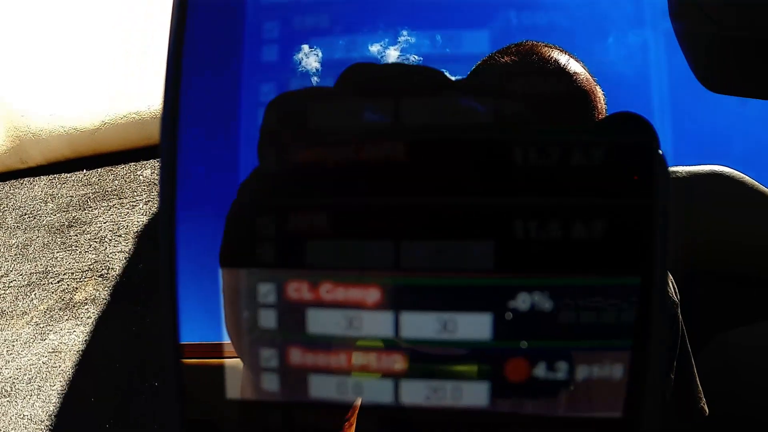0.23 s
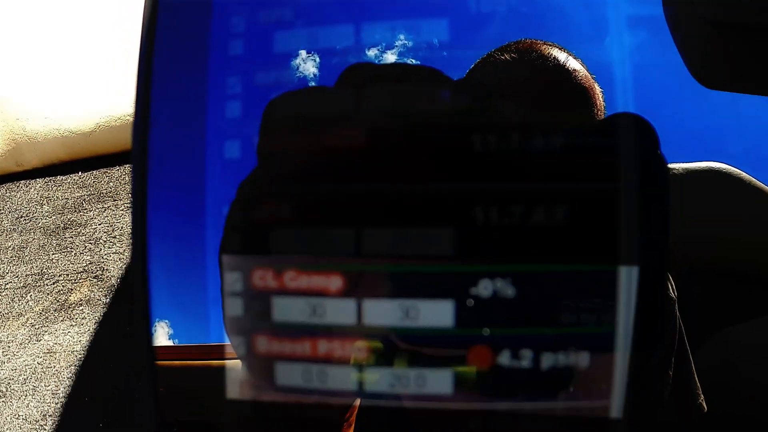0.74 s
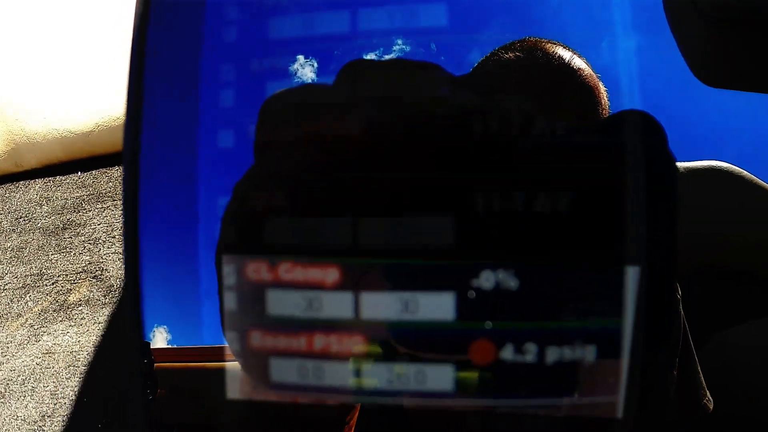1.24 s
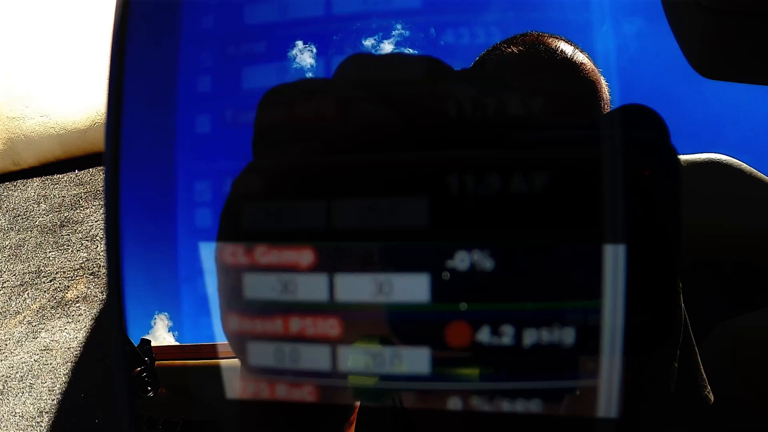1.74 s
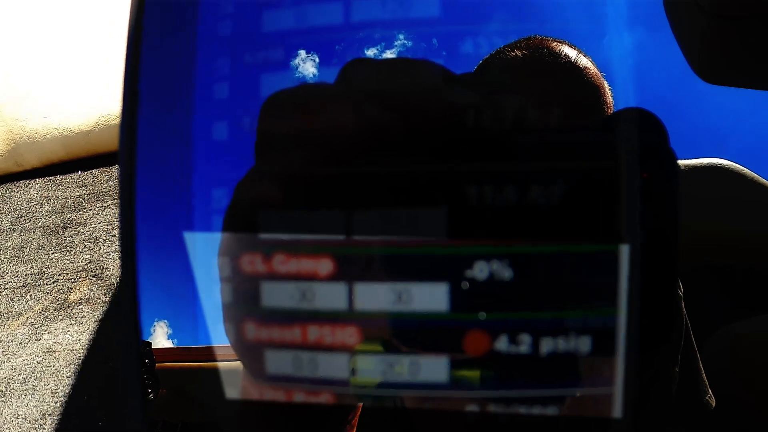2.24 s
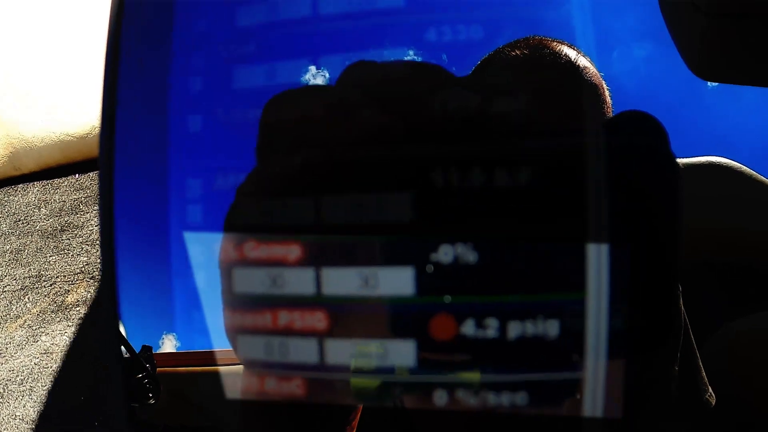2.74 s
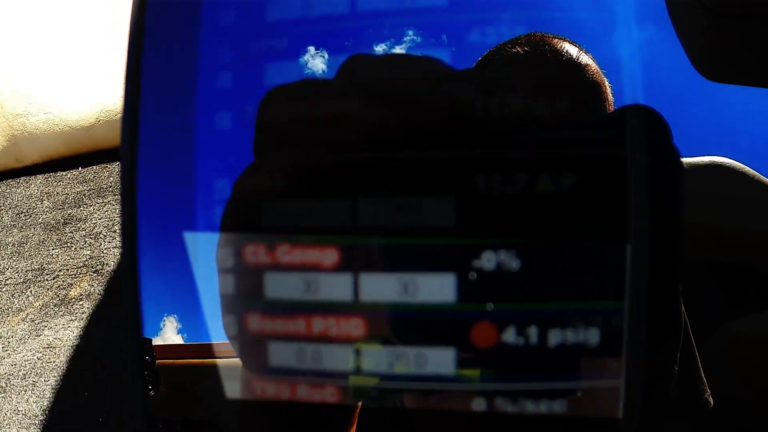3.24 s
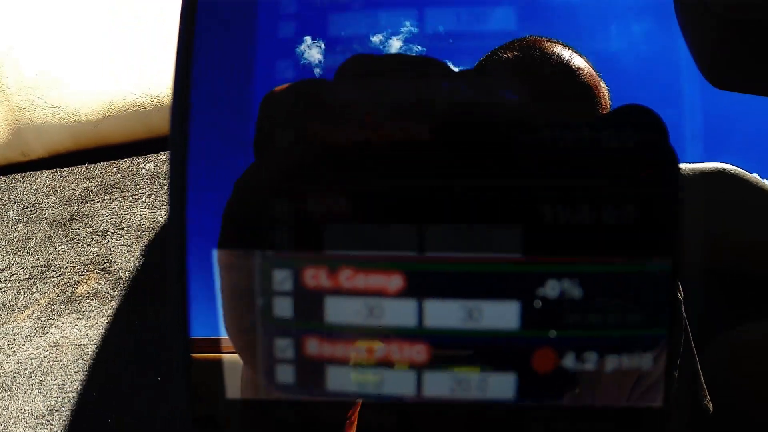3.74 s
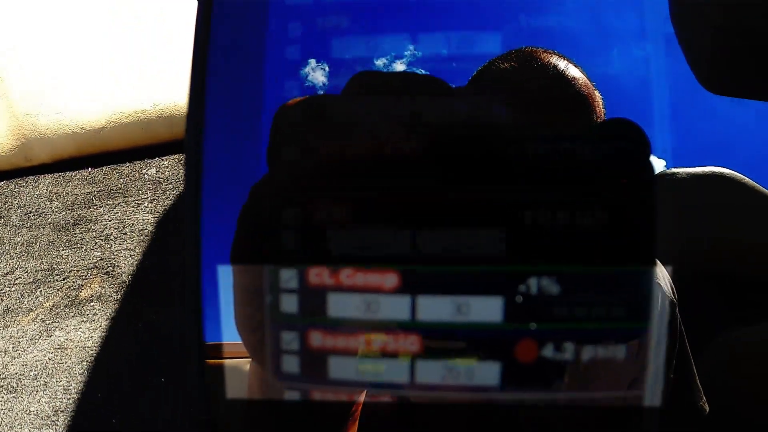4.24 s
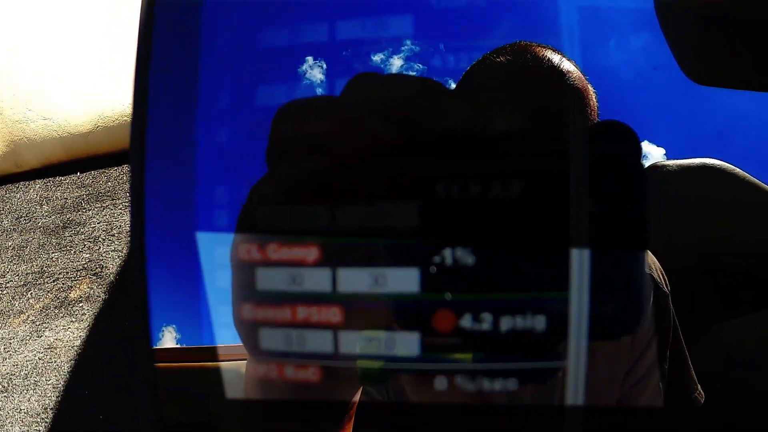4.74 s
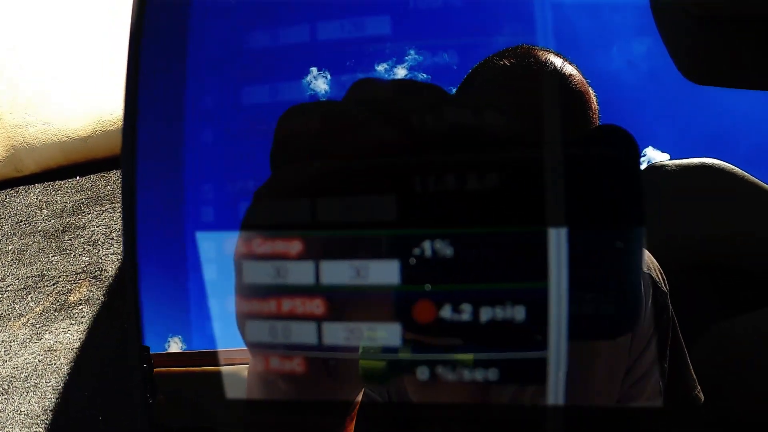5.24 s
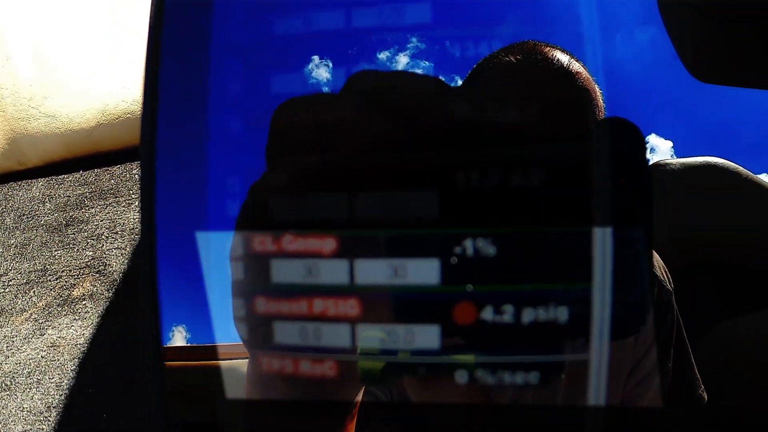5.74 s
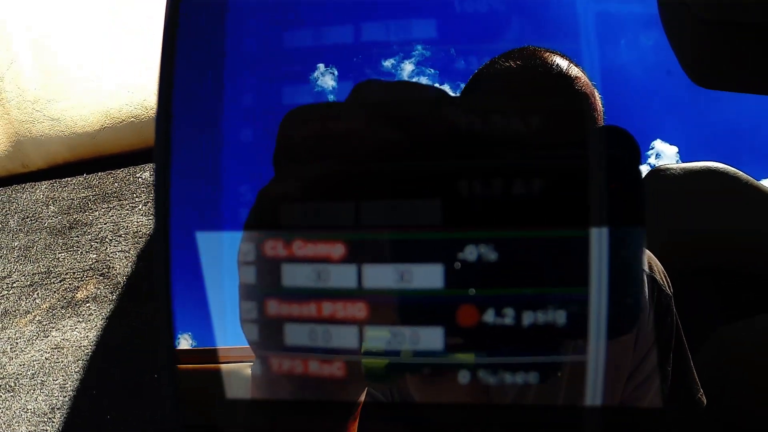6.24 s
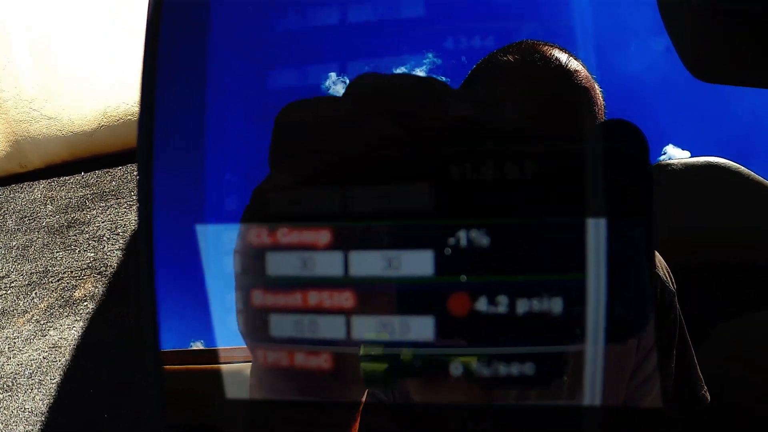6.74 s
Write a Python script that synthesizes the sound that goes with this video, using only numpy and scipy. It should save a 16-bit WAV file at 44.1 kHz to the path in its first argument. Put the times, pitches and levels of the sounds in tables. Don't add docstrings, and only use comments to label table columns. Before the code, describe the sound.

Close up, a big boat engine rumbles lumpily at constant speed, late exhaust burns thudding under a fluttering supercharger whine and ticking metal.

```python
import sys
import numpy as np
from scipy import signal
from scipy.fft import rfft, irfft, next_fast_len
from scipy.io import wavfile

SR = 44100
rng = np.random.default_rng(int(sys.argv[2]) if len(sys.argv) > 2 else 0)


def output_pcm(signal):
    pcm = np.clip(np.atleast_2d(signal).T, -1, 1) * 32767
    wavfile.write(sys.argv[1], SR, np.round(pcm).astype(np.int16))


def undo_db(level):
    steps = np.asarray(level, float) / 20
    return 10 ** steps


N = 309141
HZ = np.fft.rfftfreq(next_fast_len(N + SR), 1 / SR)

# time in seconds, cycles per second (one cycle is two crank turns).
SPEED = [(0, 8.511), (.552, 8.274), (.589, 8.359), (1.211, 8.281), (1.59, 8.431), (2.048, 8.272),
         (2.485, 8.557), (2.631, 8.419), (3.607, 8.417), (3.852, 8.325), (4.536, 8.501), (4.631, 8.34),
         (4.784, 8.549), (4.989, 8.36), (5.255, 8.514), (6.731, 8.316), (7.01, 8.342)]
START_CYCLE = -.4112

# crank angle in degrees, pipe 0 or 1, strength in dB.
CYLINDERS = [(110.3, 0, -1.2), (40.0, 1, 0.8), (290.3, 0, 8.0), (220.0, 1, 0.5), (310.0, 1, -4.8),
             (560.3, 0, -8.9), (490.0, 1, 3.5), (740.3, 0, 2.1)]
# frequency in Hz, width in Hz, level in dB.
PIPES = [
    [(83.1, 22.0, -37.4), (111.7, 22.0, -36.3), (158.8, 22.0, -32.9)],
    [(78.0, 22.0, -33.8), (120.4, 37.4, -33.4), (145.9, 22.0, -33.1)],
]
# time in seconds, level in dB.
BOOM = [(0, -34.5), (.25, -35), (.55, -30), (1, -27.3), (1.5, -26), (1.75, -24), (2.5, -25.5), (3, -28.4),
        (3.5, -31), (4, -31), (4.4, -27), (4.9, -25.7), (5.25, -29.2), (6, -30.2), (6.5, -27.5),
        (7.01, -28.4)]
SILENCER = 1 / (1 + (HZ / 205) ** 16) / (1 + (42 / (HZ + 1)) ** 8)

# time in seconds, peak in dB, ring in Hz.
POPS = [(0.0635, -17, 136), (0.1637, -11.1, 148), (0.2762, -14.1, 152), (0.4068, -16, 148),
        (0.4494, -20.5, 156), (2.7909, -15.2, 152), (2.9029, -16.3, 152), (2.9642, -18.8, 160),
        (3.0281, -16.8, 156), (3.3723, -16.8, 148), (3.4113, -19.7, 132), (3.4984, -12.8, 148),
        (3.5306, -18.1, 120), (3.6172, -11.5, 148), (3.659, -17.5, 156), (3.737, -13, 156),
        (3.7896, -17.5, 152), (3.8735, -17.7, 156), (5.166, -16.1, 148), (5.215, -20.5, 156),
        (5.2857, -13.3, 148), (5.4036, -15.8, 152), (5.4503, -19, 156), (5.5211, -15.1, 156),
        (6.1238, -19.8, 160), (6.717, -18, 160), (6.8313, -16.1, 152), (6.8862, -17.5, 156),
        (6.9447, -17.9, 152)]
# crank angle in degrees, share of cycles 0-1, peak in dB.
MUTTERS = [
    (-40, .4, -23),
    (270, .2, -24),
]

# frequency in Hz, density in dB per Hz.
RUMBLE = [(7.1, -56), (12, -20.5), (21, -16), (59, -10), (108, -8), (151, -3), (170, 0), (187, -4.5),
          (242, -21), (300, -30.5), (390, -53), (660, -120)]
RUMBLE_DB, SHAKE_DB = -34, -46

# crank angle in degrees, level in dB, ring in Hz, width in Hz, length in ms.
CLACKS = [(-62.5, -36, 1706, 380, 2.82), (-26, -30.5, 1567, 260, 4.43), (-25.5, -38, 3200, 4500, 5.2),
          (7, -40, 2350, 1540, 6.3), (13.5, -32.5, 1129, 176, 4.53), (268.5, -47, 2600, 2300, 2.7),
          (340, -36.5, 1630, 470, 3.98), (340, -39.5, 3300, 11000, 3.5), (161.5, -47, 1000, 700, 4.5),
          (74.5, -39.5, 1100, 250, 3.6), (520.5, -46, 1500, 280, 4.4), (-26.5, -38.5, 392, 104, 7),
          (76, -39, 322, 330, 6.1), (342.5, -38.5, 409, 174, 5.16), (426.5, -38, 388, 46, 6.76)]

# multiple of the cycle rate, level in dB, lead in turns.
ROTOR_TONES = [
    (658.5, 0, 0),
    (671.554, -7, .28),
    (712, -16, 0),
]
# multiple of the cycle rate, depth in dB, lead in turns.
THROBS = [(5.534, 5.5, .28), (4.871, 3.5, -.19), (8, 2.5, -.35), (5.682, 2.8, -.11), (5, 2, .19),
          (6.53, 1, -.26), (.118, 1.3, -.36)]
WHISTLE_DB = -45.5
THROB_TOP_DB = 10
HUNT_HZ = 22

# frequency in Hz, density in dB per Hz.
BAY = [(140, -23.5), (230, -4), (260, -9.5), (426, -2.5), (698, -9), (776, -11.5), (847, -5), (1230, -4),
       (1510, -1), (2150, -14.5), (5110, -15.5), (5580, -9.5), (6420, -23.5), (9800, -31), (15500, -53.5)]
# frequency in Hz, width in Hz, level in dB.
PANELS = [(300, 21, -54), (435, 13, -53.5), (572, 31, -53.5), (774.5, 50, -49), (912, 27, -54.5),
          (1239, 26, -48.5), (1558, 33, -70.5), (2614, 31, -62.5), (4200, 310, -58.5), (6050, 98, -67),
          (7700, 260, -63.5)]
# multiple of the cycle rate, depth in dB, lead in turns.
SPRINGS = [
    (6, .9, .08),
    (12, 1, .44),
]

# frequency in Hz, likeness 0-1.
SAME = [(60, .9995), (200, .9995), (350, .992), (700, .9), (1400, .82), (2800, .62), (5500, .74),
        (9000, .3), (14000, .6)]
# frequency in Hz, lead of the left in radians.
LEAD = [(0, 0), (250, -.02), (1290, -.2), (2410, -1.3), (3450, -.9), (4390, 1.2), (5430, 2.0), (6030, .9),
        (7920, 2.4), (9560, 2.2), (11300, .3), (15000, .2)]
# frequency in Hz, left minus right in dB.
LOUDER = [(60, 1.0), (110, 1.0), (200, 0.5), (380, 2.5), (700, 5.5), (1290, 6.0), (2380, 4.5), (4400, 5.0),
          (8120, 2.5), (15000, 1.0)]


def evened(x):
    return x / np.sqrt(np.mean(x ** 2))


def read(points, hz=HZ):
    f, value = np.transpose(points)
    return np.interp(np.log(hz + 1), np.log(f + 1), value)


def curve(rows):
    s, *columns = np.transpose(rows)
    return [np.interp(np.arange(N) / SR, s, c) for c in columns]


def coloured(x, gain):
    size = 2 * len(HZ) - 2
    return irfft(rfft(x, size) * gain, size)[..., :N]


def ring(hz, width, at=HZ):
    return 1 / (1 + 2j * (at - hz) / width) ** 2


def drift(per_s):
    return evened(coloured(rng.standard_normal(N), 1 / (1 + (HZ / per_s) ** 4)))


def pulsing_db(cycle, rows):
    return sum(depth * np.cos(2 * np.pi * (k * cycle + lead)) for k, depth, lead in rows)


def exhaust(cycle, uneven=.1):
    early = SR // 5
    before = cycle[0] - np.arange(early, 0, -1) * SPEED[1][1] / SR
    cycle = np.r_[before, cycle]
    trains = np.zeros((2, len(cycle)))
    for degrees, pipe, db in CYLINDERS:
        blows = np.floor(cycle - degrees / 720)
        fires = np.diff(blows, append=blows[-1])
        trains[int(pipe)] += fires * undo_db(db) * (1 + uneven * rng.standard_normal(len(cycle)))
    pipes = np.array([sum(undo_db(db) * ring(hz, width) for hz, width, db in pipe) for pipe in PIPES])
    advance = np.exp(2j * np.pi * HZ * early / SR)
    pipes = pipes * SILENCER * advance * SR / np.mean(SPEED, 0)[1] / 2
    boom_db = curve(BOOM)[0]
    low = 1 / (1 + (HZ / 75) ** 12)
    boom = undo_db(boom_db - boom_db.mean()) * coloured(trains, pipes * low).sum(0)
    upper = coloured(trains, pipes * (1 - low)).sum(0)
    return undo_db(1.43) * (boom + upper)


def pops(cycle, width=25):
    out = np.zeros(N + SR // 2)
    t = np.arange(SR // 4) / SR
    burns = list(POPS)
    for degrees, share, db in MUTTERS:
        for turn, (luck, slack, tone) in enumerate(rng.random((58, 3))):
            if luck < share:
                place = turn + (degrees + 60 * slack) / 720
                s = np.interp(place, cycle, np.arange(N) / SR)
                burns.append((s, db, 130 + 40 * tone))
    for s, db, hz in burns:
        u = np.pi * width * t
        swell = np.e * u * np.exp(-u)
        out[round(s * SR):][:len(t)] += undo_db(db) * swell * np.sin(2 * np.pi * hz * t)
    return coloured(out, SILENCER)


def rumble(cycle):
    shake = undo_db(SHAKE_DB + 3.5 * drift(4)) * np.sqrt(2) * np.sin(2 * np.pi * 4 * cycle)
    churn = evened(coloured(rng.standard_normal(N), undo_db(read(RUMBLE))))
    load_db = curve(BOOM)[0]
    swing_db = .4 * (load_db - load_db.mean()) + 3 * np.cos(2 * np.pi * (cycle - .2))
    return shake + undo_db(RUMBLE_DB + swing_db) * churn


def clacks(cycle, spread_db=.7, slack_ms=.45, alike=.6):
    size = 2048
    out = np.zeros((2, N + 2 * size))
    t = np.arange(size) / SR
    turns = np.arange(-1, 60)
    for degrees, db, hz, width, ms in CLACKS:
        noise = alike * rng.standard_normal((2, 1, size)) + (1 - alike) * rng.standard_normal((2, len(turns), size))
        noise = irfft(rfft(noise) * ring(hz, width, np.fft.rfftfreq(size, 1 / SR)))
        u = t * 2000 / ms
        puffs = np.sqrt(u) * np.exp(1 - u) * noise
        puffs *= np.sqrt(ms / size * SR / 1000 / np.mean(puffs ** 2, 2, keepdims=True))
        strength, slack = rng.standard_normal((2, len(turns)))
        place = turns + degrees / 720
        starts = np.interp(place, cycle, np.arange(N)) + (slack_ms * slack - ms / 4) * SR / 1000
        for k in np.flatnonzero((place > cycle[0]) & (place < cycle[-1])):
            out[:, size + int(starts[k]):][:, :size] += undo_db(db + spread_db * strength[k]) * puffs[:, k]
    return coloured(out[:, size:size + N], 1 / (1 + (HZ / 5000) ** 8))


def blower(cycle, waver_hz=26, fuzz=.24, fuzz_hz=200):
    slip = np.cumsum(HUNT_HZ * drift(14) + waver_hz * drift(200)) / SR
    turn = sum(undo_db(db) * np.exp(2j * np.pi * (k * cycle + lead + slip)) for k, db, lead in ROTOR_TONES)
    air = coloured(rng.standard_normal((2, 2, N)), 1 / (1 + (HZ / fuzz_hz) ** 2))
    skirts = evened(air[0]) + 1j * evened(air[1])
    throb_db = pulsing_db(cycle, THROBS) + .6 * drift(30)
    rounded_db = THROB_TOP_DB * np.tanh(throb_db / THROB_TOP_DB)
    throb = undo_db(np.where(throb_db > 0, rounded_db, throb_db))
    return undo_db(WHISTLE_DB) * evened(throb * (turn * (1 + fuzz * skirts)).real)


def bay(cycle, flicker_db=1.0):
    hiss = undo_db(read(BAY))
    power = undo_db(-37.5) ** 2 * evened(hiss) ** 2
    for hz, width, db in PANELS:
        power = power + undo_db(db) ** 2 * evened(abs(ring(hz, width))) ** 2
    out = coloured(rng.standard_normal((2, N)), np.sqrt(power))
    treble = coloured(out, 1 / (1 + (3000 / (HZ + 1)) ** 6))
    out = out + (undo_db(pulsing_db(cycle, SPRINGS)) - 1) * treble
    return out * undo_db(flicker_db * drift(42))


def scene():
    speed, = curve(SPEED)
    cycle = START_CYCLE + np.cumsum(speed) / SR
    shared, apart = clacks(cycle) + blower(cycle) + bay(cycle)
    low = exhaust(cycle) + pops(cycle) + rumble(cycle)
    same = np.clip(read(SAME), 0, 1)
    tilt = undo_db(read(LOUDER) / 2)
    left = coloured(low + shared, tilt)
    right = coloured(low + shared, same * np.exp(-1j * read(LEAD)) / tilt)
    right += coloured(apart + np.roll(low, 900), np.sqrt(1 - same ** 2) / tilt)
    return np.array([left, right])


def roll_off(x):
    return signal.sosfilt(signal.butter(12, 15650, fs=SR, output="sos"), x)


def record(dry):
    ceiling = .5
    mix = ceiling * np.tanh(dry / ceiling)
    return roll_off(mix)


dry = scene()
out = record(dry)
output_pcm(out)
```